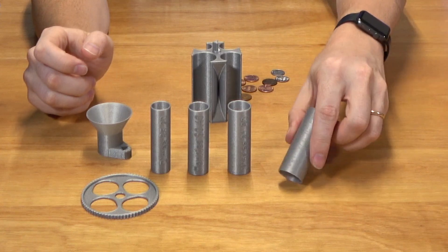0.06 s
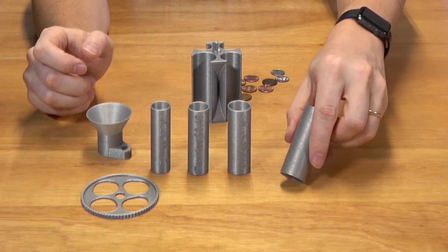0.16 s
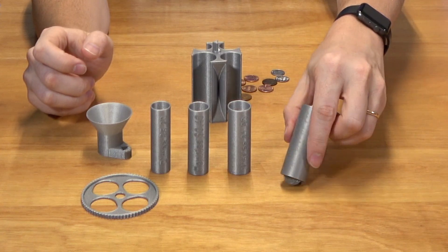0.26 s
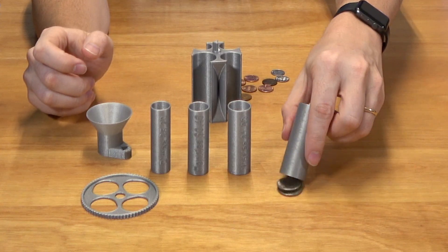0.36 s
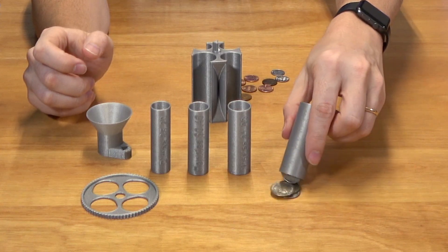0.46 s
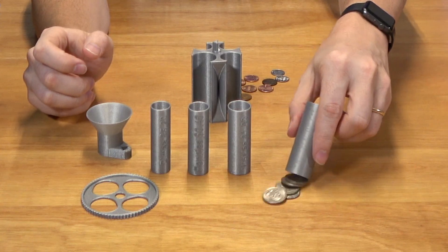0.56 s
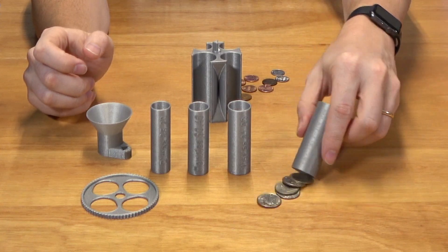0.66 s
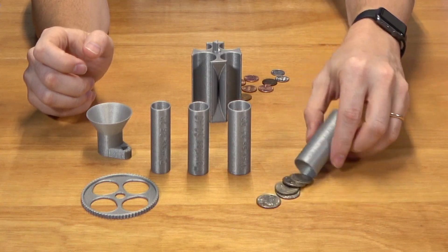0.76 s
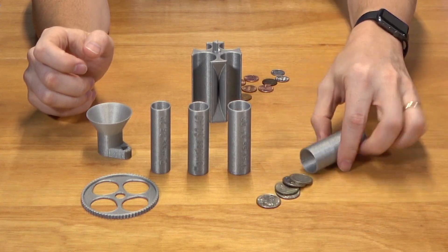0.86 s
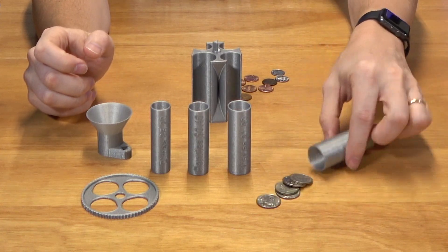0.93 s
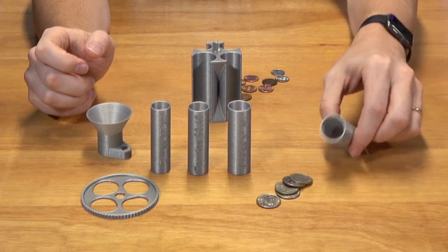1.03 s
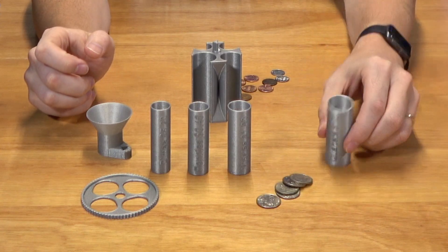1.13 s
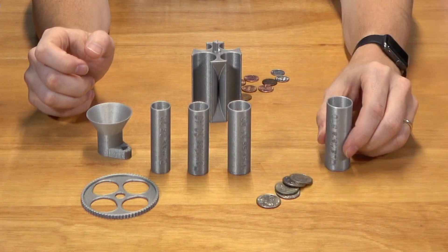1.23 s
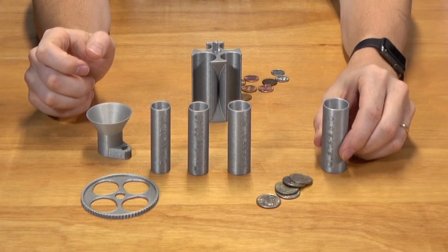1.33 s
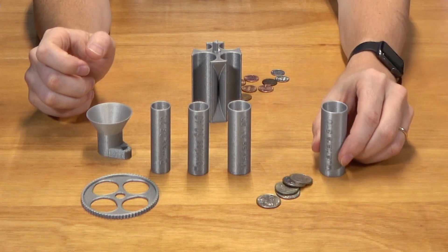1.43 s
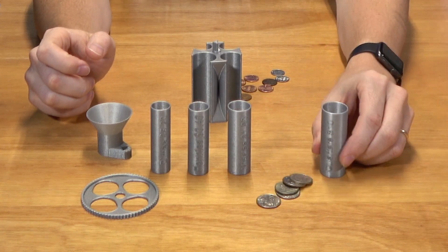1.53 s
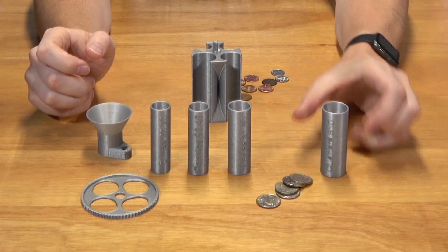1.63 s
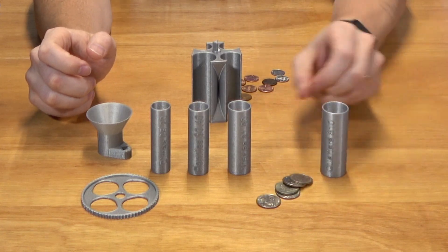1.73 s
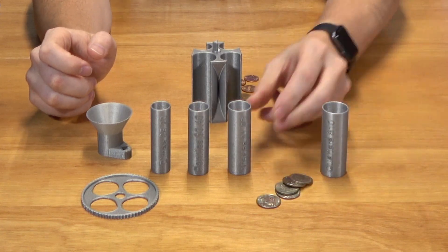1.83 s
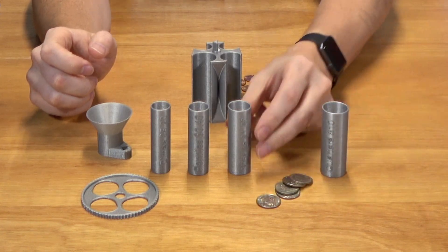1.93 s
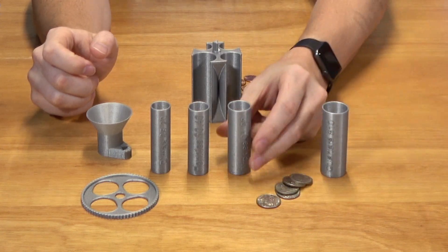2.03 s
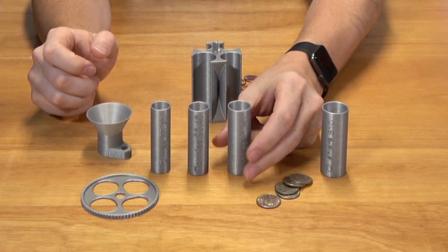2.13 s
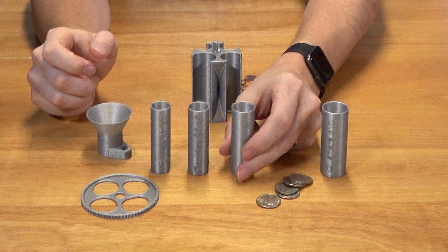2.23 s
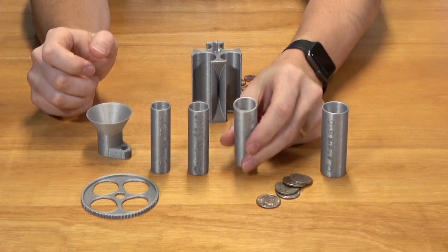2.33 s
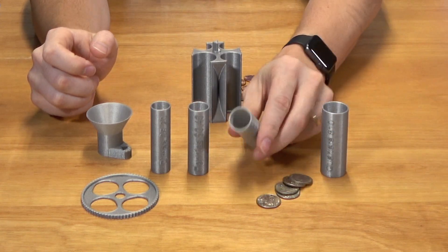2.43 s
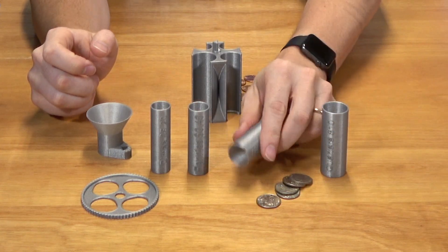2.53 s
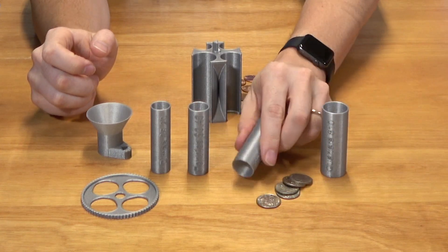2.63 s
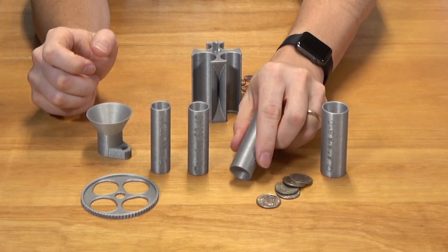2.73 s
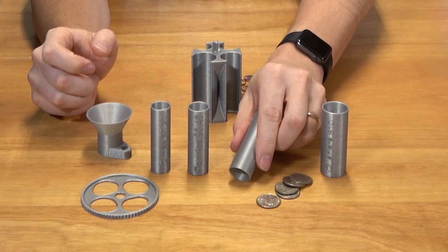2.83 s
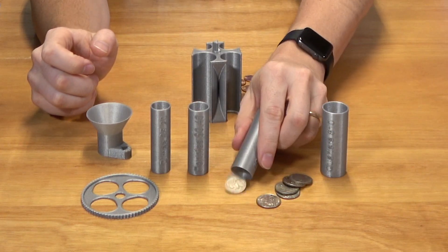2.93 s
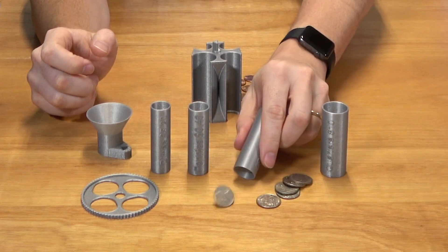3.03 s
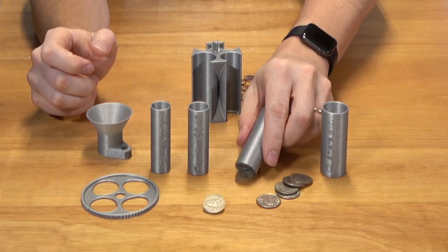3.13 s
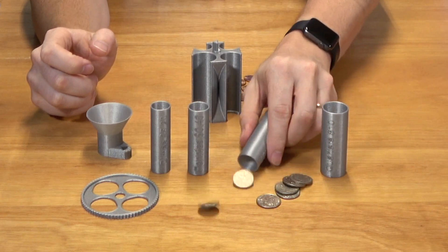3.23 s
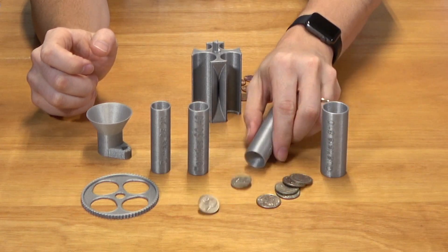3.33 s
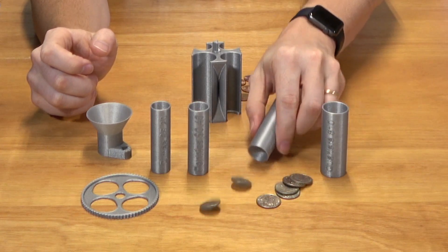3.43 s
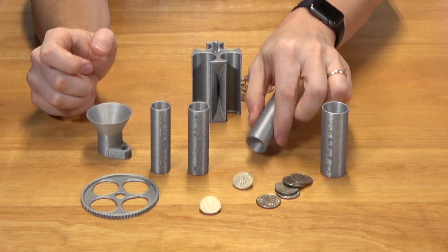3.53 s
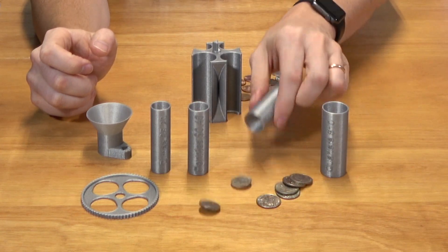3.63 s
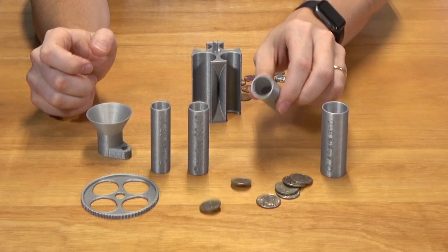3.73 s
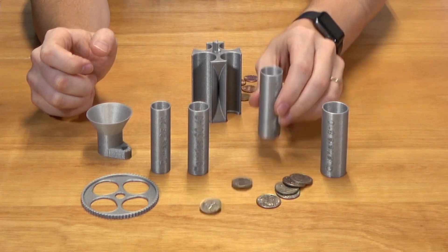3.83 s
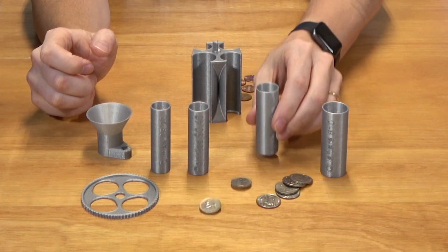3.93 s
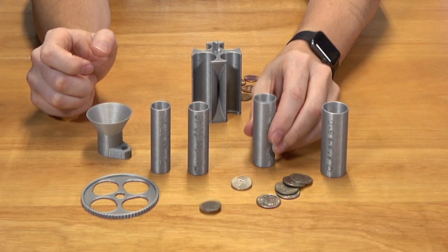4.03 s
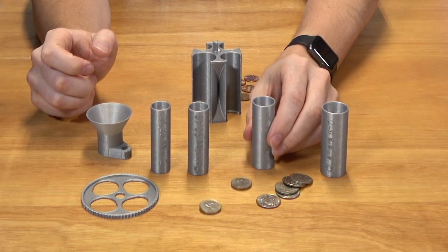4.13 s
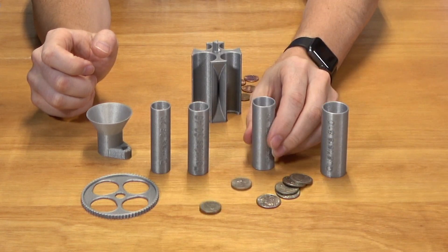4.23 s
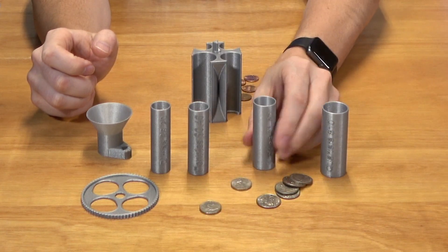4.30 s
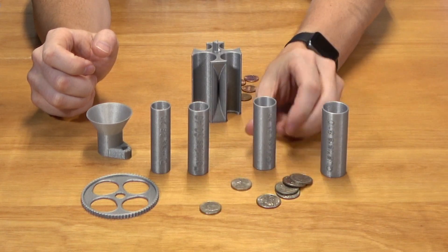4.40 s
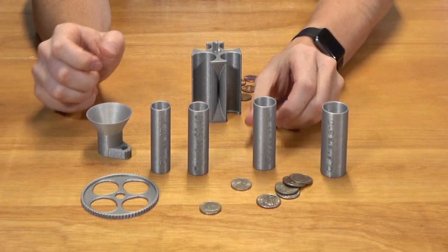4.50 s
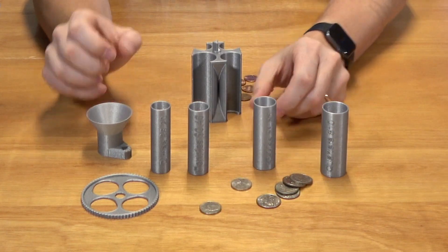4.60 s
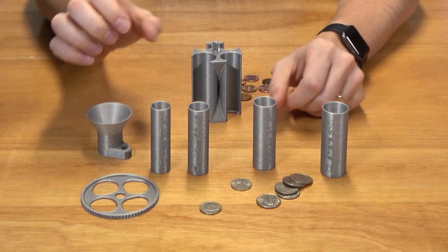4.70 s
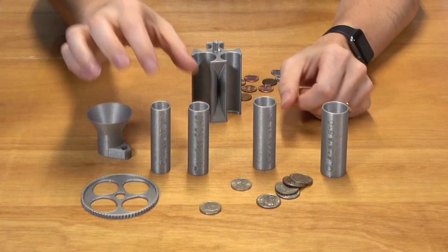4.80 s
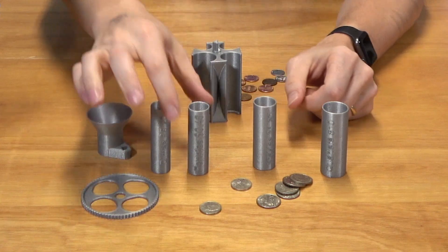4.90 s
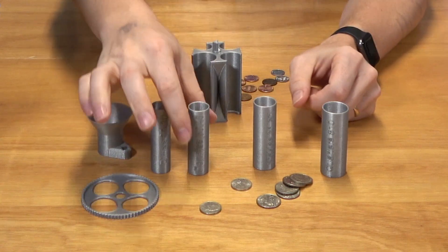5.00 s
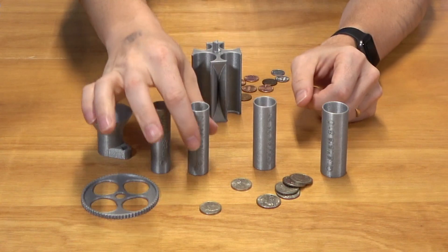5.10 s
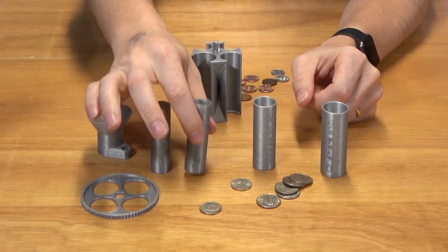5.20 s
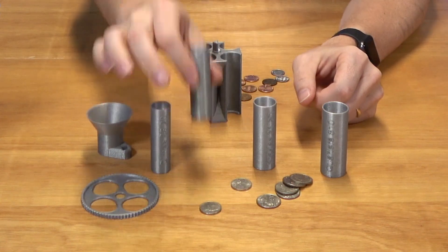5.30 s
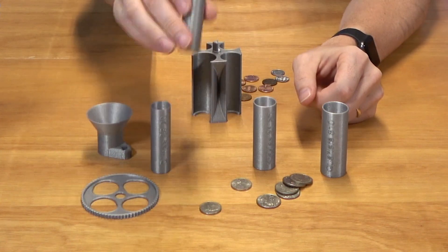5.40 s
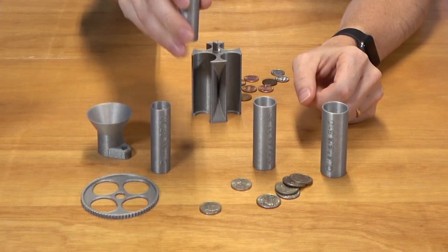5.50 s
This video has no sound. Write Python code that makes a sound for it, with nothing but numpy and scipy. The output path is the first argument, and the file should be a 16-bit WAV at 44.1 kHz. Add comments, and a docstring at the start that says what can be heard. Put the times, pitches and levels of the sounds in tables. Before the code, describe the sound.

Close microphone over a wooden tabletop, short room echo, faint low hush. First comes a dense half-second metallic spill with woody clatter, then a plastic tube dragged and knocked upright. After a pause, light rattling inside a second tube leads to two thin, high coin drops and a purring, accelerating wobble, with a firm hollow tube knock over it. Soft hand rustles and small plastic clicks end it.

```python
"""Coins tipped onto a table

Coins are tipped out of two plastic tubes onto a wooden table in a small room.
Large coins slide out in one jingling heap; two small ones drop, wobble on their milled rims ever faster and settle.
In between, the tubes are knocked, scraped and set down, and a hand brushes the wood.
Blows are short filtered pushes and dying sine waves; slides and rolls are streams of tiny random impacts."""
import sys
import numpy as np
from scipy import signal
from scipy.fft import rfft, irfft, next_fast_len
from scipy.io import wavfile
from scipy.ndimage import uniform_filter1d

SR = 44100
rng = np.random.default_rng(int(sys.argv[2]) if len(sys.argv) > 2 else 0)


def bounce(signal):
    """Save signal as a 16-bit WAV file at the path given by the first command-line argument."""
    frames = np.transpose(np.atleast_2d(signal))
    limited = np.clip(frames, -1, 1)
    pcm = np.round(limited * 32767).astype(np.int16)
    wavfile.write(sys.argv[1], SR, pcm)


N = 244755
TIME = np.arange(N) / SR

# In all tables t60/s is the time to fade by 60 dB.
# Table levels are relative: the function that plays a table may trim them.


def amp(db):
    """Decibels to gain."""
    return 10 ** (np.asarray(db) / 20)


def unit(x):
    """Scale to rms 1."""
    return x / np.sqrt(np.mean(x ** 2) + 1e-20)


def norm(x):
    """Scale to energy 1."""
    return x / np.sqrt(np.sum(x ** 2) + 1e-20)


def along(points, hz):
    """Read a curve of (f/Hz, value) points on a log frequency axis."""
    f, v = np.transpose(points)
    return np.interp(np.log(hz + 1), np.log(f + 1), v)


def add(track, s, sound):
    """Mix a sound into a track at s seconds."""
    part = track[max(0, round(s * SR)):][:len(sound)]
    part += sound[:len(part)]


def through(x, response):
    """Pass x through an impulse response."""
    return signal.fftconvolve(x, response)[:len(x)]


def colour(points, soft_hz=1e6, size=4096):
    """Causal impulse of energy 1 with this spectrum; a soft contact loses what lies above soft_hz."""
    hz = np.fft.rfftfreq(size, 1 / SR)
    gain = amp(along(points, hz)) / np.sqrt(1 + (hz / soft_hz) ** 4)
    # folding the cepstrum packs the energy as early as possible (minimum phase)
    cepstrum = irfft(np.log(np.maximum(gain, 1e-6)))
    fold = np.r_[1, np.full(size // 2 - 1, 2), np.zeros(size // 2)]
    return norm(irfft(np.exp(rfft(cepstrum * fold))))


def ring(modes, scatter_db, damping=1, spread_hz=0):
    """Damped sines of energy 1, with strengths, phases and any detuning drawn anew at each call."""
    t = TIME[:SR * 2 // 3]
    hz, db, t60 = np.transpose(modes)[:, :, None]
    hz = hz + spread_hz * rng.standard_normal(hz.shape)
    strength_db = db + scatter_db * rng.standard_normal(hz.shape)
    size = amp(strength_db - 60 * t * damping / t60)
    waves = np.sin(2 * np.pi * (hz * t + rng.random(hz.shape)))
    return norm(np.sum(size * waves, axis=0))


def contact(response, chatter_db, t60):
    """One sharp push followed by a quickly dying chatter of tiny rebounds."""
    t = TIME[:SR // 5]
    force = amp(chatter_db) * norm(rng.standard_normal(len(t)) * amp(-60 * t / t60))
    force[0] += 1
    return norm(through(force, response))


def grains(rate, spread_db):
    """Irregular tiny impacts of uneven size, about rate a second, rms 1."""
    sizes = amp(spread_db * np.clip(rng.standard_normal(N), -2, 2)) * rng.choice([-1, 1], N)
    return unit((rng.random(N) < rate / SR) * sizes)


SWELL_DB = 29.5  # an attack rises, and a release falls, by this much


def swell(start, attack, hold, release, db):
    """Gain of one movement: it rises, holds and dies away, straight in dB."""
    # an attack or release below 1 ms acts as 1 ms
    early = (start + attack - TIME) / max(attack, 1e-3)
    late = (TIME - start - attack - hold) / max(release, 1e-3)
    return amp(db - SWELL_DB * np.maximum(0, np.maximum(early, late)))


def strokes(rows):
    """Summed gain of several movements."""
    return sum(swell(*row) for row in rows)


# colour of the steady background noise: f/Hz, level/dB
AIR_COLOUR = [(20, -38), (40, -18.5), (100, -5), (200, -2.5), (300, -3.5), (450, -12.5), (1000, -18),
              (2500, -27.5), (4000, -32), (15800, -38.5)]


def air():
    """A faint, steady hush: random noise shaped by a mostly low-pitched spectrum."""
    return amp(-60.5) * through(rng.standard_normal(N), colour(AIR_COLOUR))


# how long the echoes last at each pitch: f/Hz, t60/s
ROOM_DECAY = [(150, 0.82), (500, 0.29), (2000, 0.29), (6000, 0.16), (15000, 0.22)]


def room(x, count=40):
    """Diffuse echoes, a new pattern as the sources move; the lowest bass lingers longest."""
    hz, t, z = signal.stft(rng.standard_normal((count, SR // 2)), SR, nperseg=256)
    fade = amp(-60 * t / along(ROOM_DECAY, hz)[:, None])
    tails = signal.istft(z * fade, SR, nperseg=256)[1]
    tails = tails * (1 - np.exp(-TIME[:tails.shape[1]] / 0.0023))  # the echoes build up over a few ms
    out = np.zeros(N)
    for part, when, tail in zip(np.array_split(x, count), np.array_split(TIME, count), tails):
        add(out, when[0], signal.fftconvolve(part, norm(tail)))
    return out


# resonances of the tabletop: f/Hz, level/dB, t60/s
TABLE_RESONANCES = [(260, -4, .25), (293, -9, .2), (385, -1, .2), (424, -1, .2), (655, 4, .18),
                    (845, 3, .14), (991, 3, .12), (1105, 1, .12), (1320, 2, .12), (2005, -1, .14),
                    (2872, -3, .1)]


def tabletop(wood):
    """The board answers what strikes it by ringing at its own resonances."""
    return amp(-19) * through(wood, ring(TABLE_RESONANCES, scatter_db=0))


# soft bumps of hand and tube on the tabletop: t/s, energy level/dB, thump pitch f/Hz
SOFT_BUMPS = [(0.279, -25, 55), (0.508, -17, 119.7), (0.619, -24, 59.4), (0.94, -18.5, 150.7),
              (2.781, -27.5, 45), (4.901, -28.5, 88), (5.019, -32.5, 84), (5.23, -26, 93)]
# skin and plastic brushing the table: start t/s, attack/s, hold/s, release/s, level/dB
BRUSH_STROKES = [(1.02, 0.037, 0.0062, 0.11, -63), (1.06, 0.16, 0.015, 0.048, -51),
                 (1.38, 0.067, 0.011, 0.07, -63.5), (1.6, 0.056, 0.13, 0.35, -65),
                 (1.85, 0.08, 0.3, 0.15, -70), (4.52, 0.18, 0.071, 0.21, -62),
                 (4.75, 0.23, 0.17, 0.1, -69.5), (5.12, 0.079, 0.014, 0.25, -61.5),
                 (5.24, 0.1, 0.015, 0.16, -60.5), (5.41, 0.02, 0.092, 0.15, -65)]
# colour of the brushing: f/Hz, level/dB
SKIN_COLOUR = [(410, -42), (700, -0.5), (1100, -6.5), (1260, -14.5), (1860, -4.5), (2320, -11), (9630, -18),
               (15800, -15.5)]
THUMP_T60_S = 0.081


def hand():
    """Dull bumps rock the whole tabletop; skin hisses softly over the wood."""
    out = np.zeros(N)
    thud = colour([(20, -15), (48, 0.5), (88, 2), (150, -7.0), (230, -3.5), (500, -42), (2000, -81.0)])
    t = TIME[:SR // 3]
    for s, db, hz in SOFT_BUMPS:
        envelope = (1 - np.exp(-t * hz)) * amp(-60 * t / THUMP_T60_S)
        thump = norm(np.sin(2 * np.pi * hz * t) * envelope)
        add(out, s, amp(db) * thump)
        add(out, s, amp(db - 0.5) * contact(thud, chatter_db=0, t60=.06))
    hiss = through(grains(rate=6000, spread_db=6.5), colour(SKIN_COLOUR))
    return out + strokes(BRUSH_STROKES) * hiss


# plastic tubes tapping the table: t/s, energy level/dB, contact hardness f/Hz, bore ring level/dB
TUBE_TAPS = [(0.941, -26.5, 1396, -48), (1.033, -34, 14000, -50), (1.055, -7, 2050, -22),
             (1.066, -11.5, 1174, -27), (1.179, -17, 1500, -36), (1.223, -15, 1300, -25),
             (1.232, -13.5, 1550, -25), (1.379, -22.5, 1610, -37), (1.427, -21.5, 1400, -38),
             (1.585, -27, 1470, -41), (1.62, -24, 1190, -42.5), (2.282, -28, 1690, -33.5),
             (2.438, -32.5, 2000, -38), (2.574, -34, 2185, -46), (4.1154, -1, 1810, -2.5),
             (5.212, -22.5, 1500, -37)]
# hard clacks of a tube's edge: t/s, energy level/dB
EDGE_CLACKS = [(0.941, -32.5), (2.318, -32.5), (5.447, -35), (5.4765, -19), (5.488, -26)]
# coins sliding down the bore of a tube: start t/s, attack/s, hold/s, release/s, level/dB
COIN_SLIDES = [(0.02, 0.26, 0.041, 0.02, -47), (2.29, 0.025, 0.009, 0.03, -48),
               (2.735, 0.043, 0.022, 0.047, -43.5), (2.8, 0.11, 0.018, 0.089, -48.5)]
# a tube's foot dragged on the wood: start t/s, attack/s, hold/s, release/s, level/dB
FOOT_SCRAPES = [(1.05, 0.012, 0.022, 0.15, -52.5), (1.07, 0.15, 0.017, 0.045, -43),
                (1.34, 0.087, 0.02, 0.2, -49.5), (5.12, 0.059, 0.045, 0.06, -63.5),
                (5.24, 0.074, 0.038, 0.076, -58), (5.4, 0.049, 0.02, 0.12, -62.5)]
# colours of the plastic shell, the edge clack and the scrape: f/Hz, level/dB
PLASTIC_COLOUR = [(60, -14), (180, -11.5), (380, 1), (600, -4), (850, -1.5), (1200, -2.5), (1700, -4),
                  (3500, -15), (6000, -14), (14000, -20.5)]
CLACK_COLOUR = [(300, -21), (1200, -7.5), (2500, 4), (4000, 1.5), (5500, -4.5), (7500, -22), (15000, -20)]
SCRAPE_COLOUR = [(100, -24), (250, -5), (400, 6), (800, -4), (1150, -2.5), (2000, -15), (2700, -37),
                 (6000, -47), (12000, -52)]
# resonances of the air in a tube: f/Hz, level/dB, t60/s
BORE_RESONANCES = [(1020, -6.5, 0.029), (1125, -0.5, 0.047), (1810, -13, 0.018), (2244, -12.5, .025),
                   (2756, -11.5, .018), (4950, -15.5, 0.0074)]


def tubes():
    """Hollow plastic taps and scrapes the table; knocks and sliding coins sound the air in the bore."""
    out = np.zeros(N)
    for s, db, hard_hz, bore_db in TUBE_TAPS:
        # a harder touch wakes higher resonances
        shell = np.array(PLASTIC_COLOUR) * [np.sqrt(hard_hz / 1500), 1]
        tap = contact(colour(shell, soft_hz=hard_hz), chatter_db=4, t60=0.027)
        add(out, s, amp(db - 3.0) * tap)
        add(out, s, amp(bore_db) * ring(BORE_RESONANCES, scatter_db=2))
    for s, db in EDGE_CLACKS:
        add(out, s, amp(db) * contact(colour(CLACK_COLOUR), chatter_db=7, t60=0.023))
    sliding = strokes(COIN_SLIDES) * grains(rate=400, spread_db=4)
    out += amp(-4) * through(sliding, ring(BORE_RESONANCES, scatter_db=1))
    scraping = strokes(FOOT_SCRAPES) * grains(rate=450, spread_db=1.5)
    return out + through(scraping, colour(SCRAPE_COLOUR))


# colours of the rolling rumble and of a milled rim ticking on wood: f/Hz, level/dB
RUMBLE_COLOUR = [(60, -19), (190, -18.5), (300, -5), (450, -3.5), (1100, -4), (1700, -7), (2800, -9),
                 (4000, -18.5), (6000, -44), (15000, -37)]
RIM_COLOUR = [(400, -24), (1200, -9.5), (3200, -8), (4000, 2), (4700, 1), (5400, -10.5), (6600, -14.5),
              (9000, -24.5), (15000, -32)]
# ringing of the first and of the second small coin: f/Hz, level/dB, undamped t60/s
FIRST_RINGING = [(12605, -1, 0.32), (14370, 0, .35)]
SECOND_RINGING = [(13704, -1, .7), (13997, 0, 0.45)]
# the small coins roll from their landing until both lie flat
FIRST_LANDS_S, SECOND_LANDS_S, SETTLE_S = 3.002, 3.6, 4.518
ROLL_ATTACK_S, ROLL_RELEASE_S = 0.006, 0.056
# base levels, before the changes over time below
RUMBLE_DB, RIDGE_DB, GRIT_DB, FIRST_RING_DB, SECOND_RING_DB = -43, -55.5, -61, -67.5, -63
TICK_GROWS_DB_PER_S, SECOND_RING_SAG_DB_PER_S = 8, 14
ALONE_RUMBLE_DB, ALONE_TICK_DB = -2, -4.5  # added while only one coin rolls
# wobble: about the first dip, turns a second at that time, time in which that rate doubles
FIRST_DIP_S, WOBBLE_HZ, WOBBLE_DOUBLES_S = 3.046, 9.2, 1.05
DIP_SKEW = 0.75  # each dip starts more suddenly than it ends
SINK_S, LAST_SWING = 0.73, 0.091  # over this last stretch the swing shrinks to this share
RUMBLE_SWING_DB, TICK_SWING_DB, RING_SWING_DB = 3, 9.5, -1  # change at each full dip
RIDGES_PER_S = 240  # typical pace


def rolling():
    """Milled rims drum on the grain of the wood; the ticking swells once a wobble, ever faster."""
    def roll(lands):
        return swell(lands, ROLL_ATTACK_S, SETTLE_S - lands, ROLL_RELEASE_S, 0)

    first_roll = roll(FIRST_LANDS_S)
    age, alone = TIME - FIRST_DIP_S, TIME < SECOND_LANDS_S
    turns = WOBBLE_HZ * WOBBLE_DOUBLES_S / np.log(2) * (2 ** (age / WOBBLE_DOUBLES_S) - 1)
    angle = 2 * np.pi * turns - DIP_SKEW
    # the swing shrinks as the coins sink
    swing = np.interp(TIME, [SETTLE_S - SINK_S, SETTLE_S], [1, LAST_SWING])
    lean = np.cos(angle + DIP_SKEW * np.cos(angle)) * swing
    drum_gain = first_roll * amp(RUMBLE_DB + ALONE_RUMBLE_DB * alone + RUMBLE_SWING_DB * lean)
    drum = drum_gain * grains(rate=3000, spread_db=2)

    # ridge after ridge of the rim meets the wood, at a slightly uneven pace
    drift = unit(uniform_filter1d(rng.standard_normal(N), SR // 250))
    pace = RIDGES_PER_S * amp(3 * drift)
    ridges = np.diff(np.floor(np.cumsum(pace) / SR), prepend=0) * rng.uniform(.2, 1, N)
    tick_gain = first_roll * amp(ALONE_TICK_DB * alone + TICK_GROWS_DB_PER_S * age)
    ridge_ticks = amp(RIDGE_DB + TICK_SWING_DB * lean) * unit(ridges)
    grit = amp(GRIT_DB) * grains(rate=500, spread_db=0.5)
    ticks = tick_gain * (ridge_ticks + grit)

    # the rolling keeps each coin softly ringing
    first = first_roll * amp(FIRST_RING_DB)
    sag_db = SECOND_RING_SAG_DB_PER_S * (TIME - SECOND_LANDS_S)
    second = roll(SECOND_LANDS_S) * amp(SECOND_RING_DB - sag_db)
    shimmer = np.zeros(N)
    for ringing, modes in (first, FIRST_RINGING), (second, SECOND_RINGING):
        push = ringing * amp(RING_SWING_DB * lean) * grains(rate=450, spread_db=12.0)
        shimmer += through(push, ring(modes, scatter_db=3, damping=2.5))
    return shimmer, through(drum, colour(RUMBLE_COLOUR)) + through(ticks, colour(RIM_COLOUR))


# small coins rattling inside their tube: t/s, clink energy level/dB, tube knock energy level/dB
TUBE_RATTLES = [(2.3174, -35, -19), (2.3241, -30.5, -22), (2.768, -38, -29), (2.785, -16, -30.5),
                (2.7901, -17, -33), (2.8048, -17, -38), (2.8648, -31, -22), (2.9057, -40, -25.5),
                (2.916, -34, -22), (2.938, -31, -21), (2.9569, -28.5, -21.5), (2.972, -32, -28),
                (2.987, -30, -28.5)]
# small coins landing and bouncing: t/s, then energy level/dB of clink, rim click and wood knock
COIN_DROPS = [(3.0026, -28, -18.5, -1), (3.0192, -42, -55, -11), (3.0366, -40, -31, -43),
              (3.0417, -37, -16, -20), (3.1601, -30.5, -24.5, -14.5), (3.2388, -18, -9, -7.5),
              (3.2468, -23, -6, -7), (3.253, -20.5, -29, -5.5), (3.2817, -40, -17.8, -17),
              (3.3024, -53, -23.5, -38), (3.3174, -50, -20.5, -16.5), (3.3277, -34, -19, -19),
              (3.348, -33, -18, -13), (3.369, -33, -20, -33), (3.5102, -42, -18.5, -30.5),
              (3.658, -50, -36, -41), (3.793, -30, -15, -24), (4.4683, -40, -14.5, -18)]
# colours of a small coin's clink and of a coin's knock on wood: f/Hz, level/dB
SMALL_CLINK_COLOUR = [(3000, -48), (8500, -12), (10300, 4), (12500, 0), (14000, -6), (15000, -8),
                      (15800, -14)]
KNOCK_COLOUR = [(60, -11), (180, -7), (350, 3.5), (700, -1), (1200, 1), (2400, -3), (3300, -9.5),
                (5000, -29.5), (11000, -57.5)]


def small_coins():
    """Two small coins rattle, damped by the tube, then drop on the wood and ring freely."""
    metal, wood = np.zeros((2, N))
    clink, rim, knock = colour(SMALL_CLINK_COLOUR), colour(RIM_COLOUR), colour(KNOCK_COLOUR)
    shell = colour(PLASTIC_COLOUR, soft_hz=3840)
    both_coins = FIRST_RINGING[1:] + SECOND_RINGING
    for s, clink_db, tube_db in TUBE_RATTLES:
        add(metal, s, amp(clink_db - 4.5) * contact(clink, chatter_db=17.5, t60=0.034))
        add(metal, s, amp(clink_db - 1) * ring(both_coins, scatter_db=2, damping=5.5, spread_hz=100))
        add(wood, s, amp(tube_db - 2) * contact(shell, chatter_db=0.5, t60=0.031))
        add(wood, s, amp(tube_db - 2) * ring(BORE_RESONANCES, scatter_db=2))
    for s, clink_db, rim_db, knock_db in COIN_DROPS:
        add(metal, s, amp(clink_db) * contact(clink, chatter_db=-4, t60=0.0086))
        add(metal, s, amp(clink_db + 2) * ring(SECOND_RINGING, scatter_db=2, spread_hz=4))
        add(wood, s, amp(rim_db + 4.0) * contact(rim, chatter_db=5.5, t60=0.0064))
        add(wood, s, amp(knock_db + .5) * contact(knock, chatter_db=-2, t60=.02))
    return metal, wood


# hardest blows of the large coins on each other and the table:
# t/s, then energy level/dB of clink, rim click and wood knock
LARGE_BLOWS = [(0.267, -16, -34.5, -41), (0.2817, -25, -22.5, -12.5), (0.3319, -14.5, -18.5, -11.5),
               (0.3394, -19.5, -15, 2), (0.387, -33, -28, -7.5), (0.4044, -21.5, -10, -4.5),
               (0.4122, -5, -2, -10), (0.4208, -4, -1.5, -2.5), (0.4303, -14.5, -16, -10.5),
               (0.4547, -6, -28, -20), (0.4614, 0.5, -14, -19), (0.4646, 2.5, -3.5, -19.5),
               (0.467, -3.5, -1.5, -6), (0.5007, -9, -15.5, -13.5), (0.5092, -0.5, -5, -1.5),
               (0.549, -18, -19, -11.5), (0.5638, -4, -14.5, -8.5), (0.602, -7, -25, -18),
               (0.6098, -6, -11.5, -9.5), (0.6142, -3.5, -15, -3), (0.6261, -2.5, -10.5, -5.5),
               (0.6449, -11, -8, -17), (0.6484, -7, -23, -3), (0.6589, -5, -29, -11),
               (0.6722, -9.5, -11, -19), (0.6934, -8, -14, -9.5), (0.7343, -22, -30, -12),
               (0.7537, -34.5, -12.5, -10), (0.7762, -37.5, -16.5, -12), (0.7921, -35, -19.5, -13)]
# ringing of the large coins: f/Hz, level/dB, undamped t60/s
LARGE_RINGING = [(9220, -3, .2), (9290, -8, .14), (9475, -7, .12), (9763, -10, .12), (10070, -13, .08),
                 (10990, -10, .06), (11714, -5, .05), (11990, -4, .06), (12150, -5, .06), (12560, -6, .05),
                 (13700, -9, .05), (15295, -3, .15), (15580, -5, .11), (15661, 2, .17)]
# colours of the clink, the rim click and the clatter on wood: f/Hz, level/dB
CLINK_COLOUR = [(3000, -46), (7500, -26), (8500, -18), (9300, -10.5), (10300, -4.5), (11900, -2),
                (13800, -7.5), (14800, -7), (15700, -5)]
CLICK_COLOUR = [(400, -11.5), (1500, -5.5), (2800, -5), (4000, 2), (5200, -7), (6400, -5), (7400, -18),
                (9000, -16.5), (15000, -17.5)]
CLATTER_COLOUR = [(40, -5), (150, -2.5), (350, 1), (1000, 2.5), (1700, -6.5), (3000, -5.5), (4200, -12),
                  (5500, -17.5), (8500, -22.5), (11000, -45.5)]
# the coins leave the tube in two jingling surges: start t/s, attack/s, hold/s, release/s, level/dB
JINGLE_SURGES = [(0.29, 0.125, 0.11, 0.17, -35.5), (0.597, 0.01, 0.085, 0.097, -31.5)]
# the heap clatters until it lies flat: start t/s, attack/s, hold/s, release/s, level/dB
HEAP_CLATTER = (0.2757, 0.1136, 0.4, 0.01, -35.5)
CLATTER_SAG_DB_PER_S = 14  # the stack runs out of weight
# the stack creeps down the tilted tube with faint clinks:
# start t/s, attack/s, hold/s, release/s (below zero: an abrupt end), level/dB
STACK_CREEP = (0.0, 0.2, 0.36, -0.06, -58.5)


def large_coins():
    """The stack spills: hard clashes over a clatter of small contacts. Returns (metal, wood)."""
    metal, wood = np.zeros((2, N))
    clink, click, knock = colour(CLINK_COLOUR), colour(CLICK_COLOUR), colour(KNOCK_COLOUR)
    for s, clink_db, click_db, knock_db in LARGE_BLOWS:
        add(metal, s, amp(clink_db + 1.5) * contact(clink, chatter_db=11, t60=.016))
        # no two coins are tuned quite alike
        add(metal, s, amp(clink_db - 3.5) * ring(LARGE_RINGING, scatter_db=1.0, spread_hz=35))
        add(wood, s, amp(click_db + 0.5) * contact(click, chatter_db=1, t60=.012))
        add(wood, s, amp(knock_db - 3.0) * contact(knock, chatter_db=6.0, t60=0.027))

    creep = swell(*STACK_CREEP) * grains(rate=140, spread_db=6)
    metal += through(creep, ring(LARGE_RINGING[:10], scatter_db=1, damping=3.8))

    jingle = strokes(JINGLE_SURGES)
    metal += amp(-10) * through(jingle * grains(rate=410, spread_db=8.0), clink)
    jingle_ring = ring(LARGE_RINGING, scatter_db=2.0, damping=2.2)
    metal += through(jingle * grains(rate=1200, spread_db=7.5), jingle_ring)

    full_s = HEAP_CLATTER[0] + HEAP_CLATTER[1]  # the attack ends here and the sag begins
    clatter = swell(*HEAP_CLATTER) * amp(-CLATTER_SAG_DB_PER_S * np.maximum(0, TIME - full_s))
    wood += amp(-4.0) * through(clatter * grains(rate=1200, spread_db=5.5), colour(CLATTER_COLOUR))
    return metal, wood


def scene():
    """Metal rings directly, the blows of coins and tubes on the wood sound the tabletop, and the room answers
    all."""
    metal, wood = np.sum([large_coins(), small_coins(), rolling()], axis=0)
    wood = wood + tubes()
    wood = wood + tabletop(wood)
    soft = hand()
    echoes = room(amp(-6.0) * wood + amp(-7.0) * metal + amp(-7) * soft)
    return (metal + wood + soft + echoes + air())[None]


TOP_HZ = 15960


def record(dry):
    """Nothing above the band limit remains; the last 200 Hz below it fade out."""
    size = next_fast_len(N + SR // 2)
    gain = np.clip((TOP_HZ - np.fft.rfftfreq(size, 1 / SR)) / 200, 0, 1)
    return irfft(rfft(dry, size) * gain, size)[:, :N]


dry = scene()
out = record(dry)
bounce(out)
```